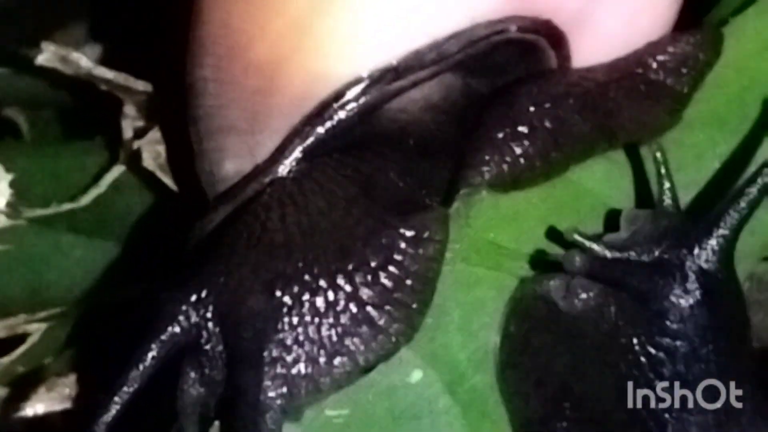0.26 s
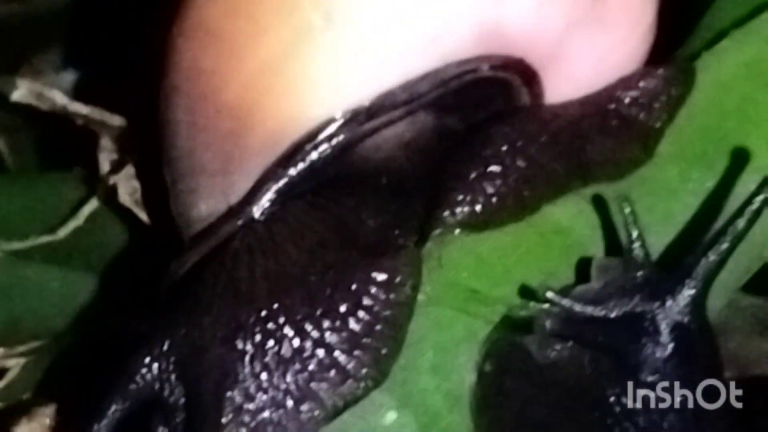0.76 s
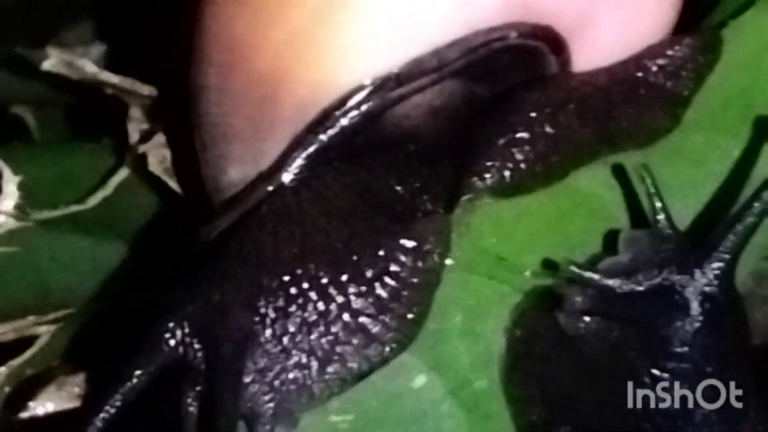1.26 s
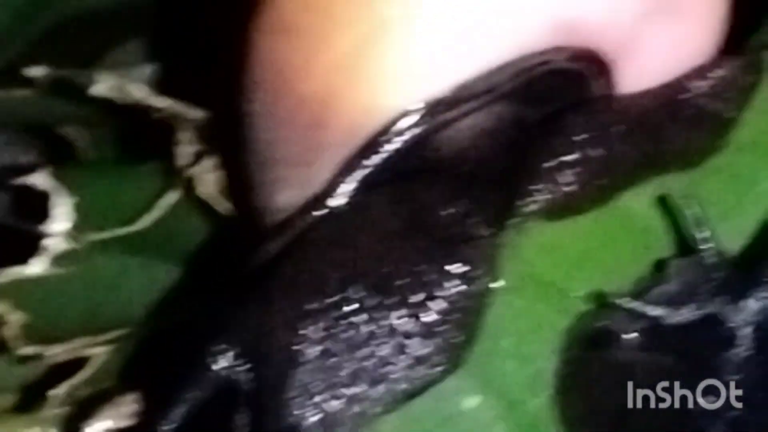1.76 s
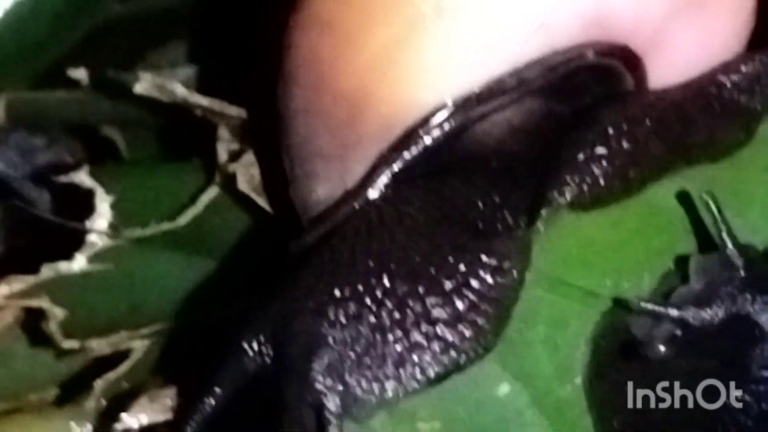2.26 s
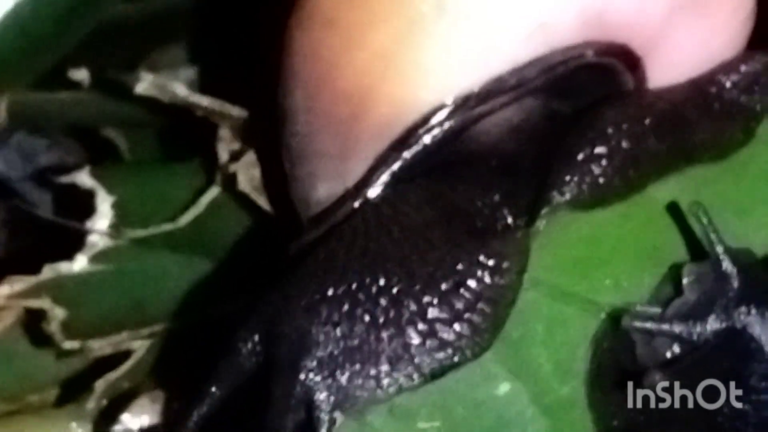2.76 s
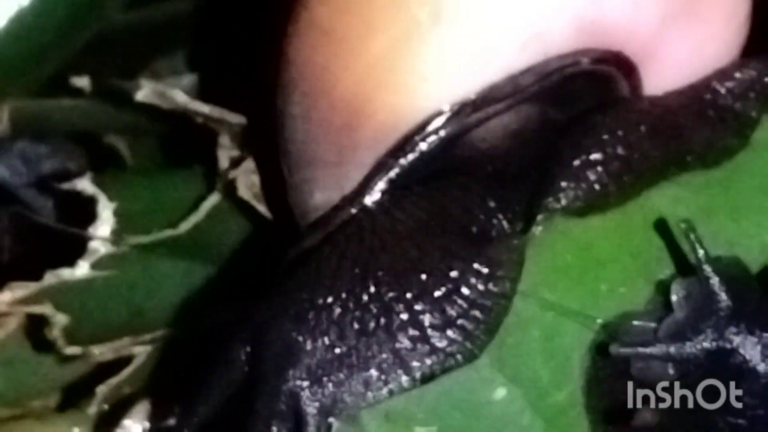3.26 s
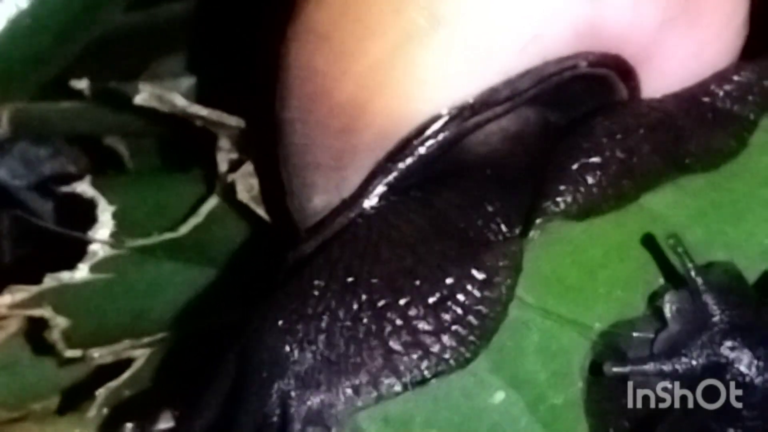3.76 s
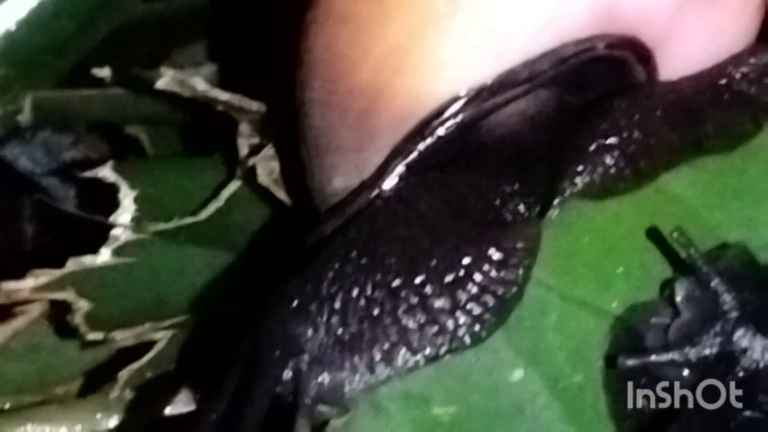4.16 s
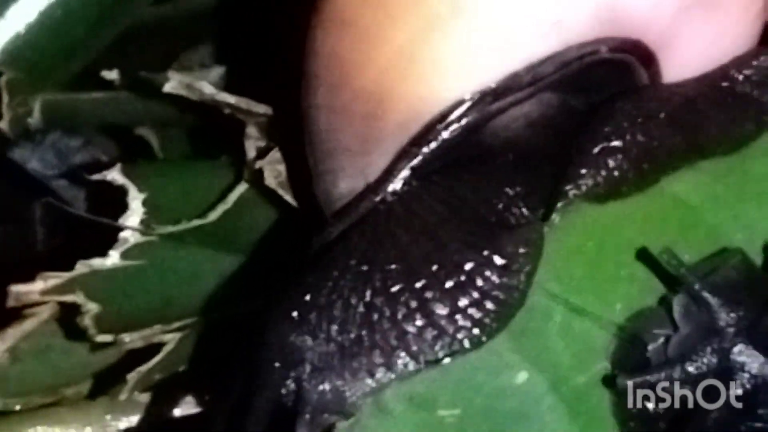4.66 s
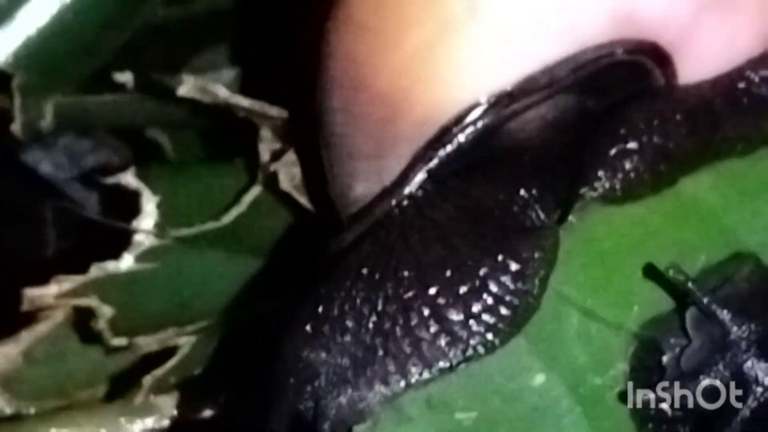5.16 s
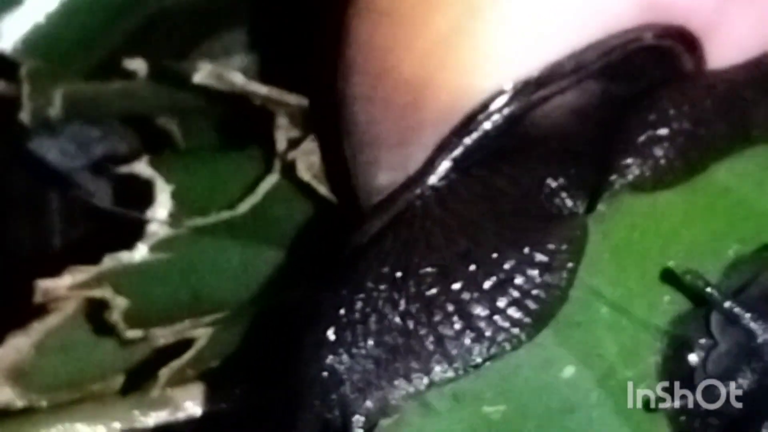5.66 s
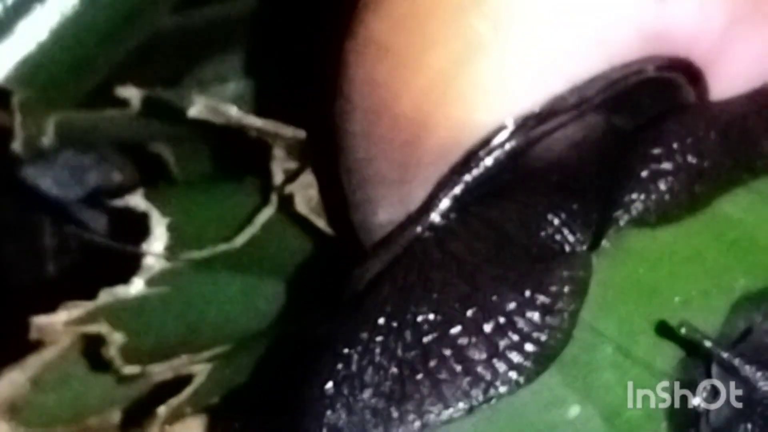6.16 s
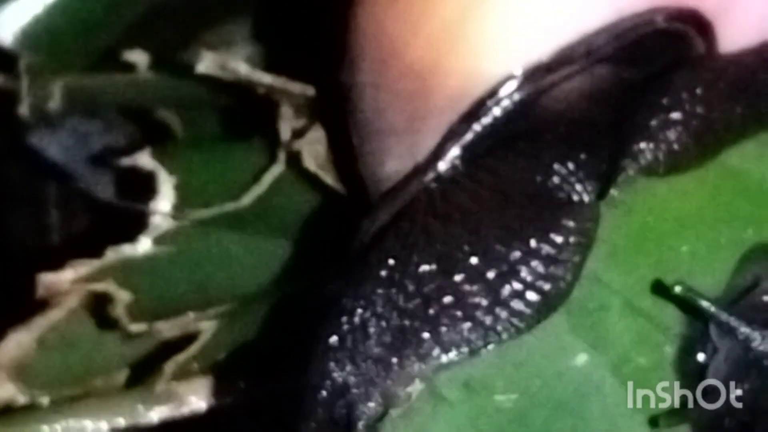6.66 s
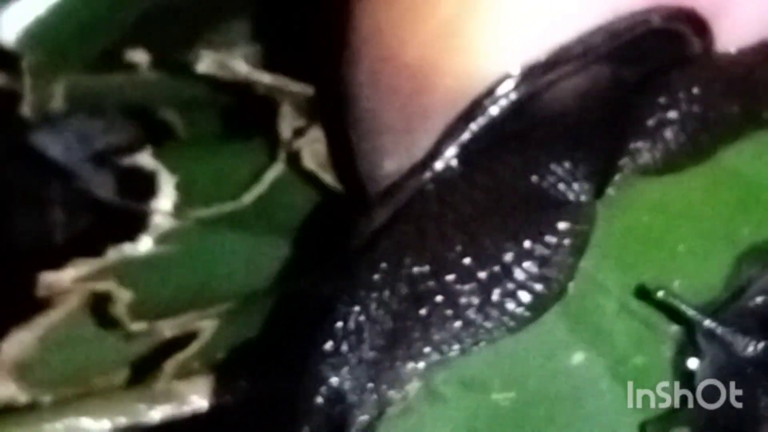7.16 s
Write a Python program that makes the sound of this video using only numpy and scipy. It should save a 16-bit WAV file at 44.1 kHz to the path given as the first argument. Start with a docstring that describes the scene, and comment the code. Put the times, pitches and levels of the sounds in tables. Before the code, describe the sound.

Night in wet vegetation. A close frog gives a high piping call of five rapid pulses, about two and a half times a second, throughout. Behind it, crowds of frogs rattle in uneven volleys, a near cricket chirps shrilly every second and a half, and other crickets trill. Leaves tick and bump softly beside the microphone, over still air with little echo.

```python
"""A near frog repeats a call, mostly of five pulses, over rattling crowds of frogs and chirping, trilling crickets.
It is night in wet vegetation: leaves tick and are bumped softly close by, over still air.
Frogs and crickets are trains of short gliding tones; the crowds' pulses ring coloured throats.
Leaves, air and the crickets' scrape are shaped noise; fading noise serves as the soft echo of the trees."""
import sys
import numpy as np
from scipy import signal
from scipy.fft import rfft, irfft
from scipy.io import wavfile
from scipy.ndimage import uniform_filter1d

SR = 44100
rng = np.random.default_rng(int(sys.argv[2]) if len(sys.argv) > 2 else 0)


def to_wav(s):
    """Save 16-bit WAV."""
    ch = np.atleast_2d(s).T  # columns
    pcm = np.round(np.clip(ch, -1, 1) * 32767)  # PCM
    wavfile.write(sys.argv[1], SR, pcm.astype(np.int16))


N = 327663
T = np.arange(N) / SR
STROKE_S = .0432  # time between the wing strokes of a chirp


def undb(db):
    """Decibels to gain."""
    return 10 ** (np.asarray(db) / 20)


def unit(x):
    """Scale to rms 1."""
    return x / np.sqrt(np.mean(x ** 2))


def curves(table):
    """Each column of a table after its times, joined by straight lines in time."""
    s, *columns = np.transpose(table)
    return [np.interp(T, s, c) for c in columns]


def add(out, s, sound):
    """Mix a sound in at a time in seconds, keeping only what falls inside the scene."""
    i = int(round(s * SR))
    a, b = max(i, 0), min(i + len(sound), N)
    if b > a:
        out[a:b] += sound[a - i:b - i]


def colour(x, points):
    """Filter by a spectrum of (frequency [Hz], level [dB]) points, silent outside them."""
    hz, db = np.transpose(points)
    f = np.maximum(np.fft.rfftfreq(len(x), 1 / SR), 1)
    gain = undb(np.interp(np.log(f), np.log(hz), db, left=-np.inf, right=-np.inf))
    return irfft(rfft(x) * gain, len(x))


def fading_noise(t60):
    """One second of noise that fades by 60 dB in t60 seconds, with unit energy."""
    t = np.arange(SR) / SR
    tail = rng.standard_normal(SR) * np.exp(-np.log(1000) * t / t60)
    return tail / np.linalg.norm(tail)


def trees(x, t60):
    """Diffuse echo from countless leaves and trunks."""
    return signal.fftconvolve(x, fading_noise(t60))[:N]


def syllable(hz, length, rise, glide_hz, steep):
    """One complex tone pulse: it swells for the share `rise` of its length and glides through hz at its peak."""
    u = np.arange(int(length * SR)) / (length * SR)
    attack = (u / rise) ** (steep * rise)
    decay = ((1 - u) / (1 - rise)) ** (steep * (1 - rise))
    phase = 2 * np.pi * np.cumsum(hz + glide_hz * (u - rise)) / SR
    return attack * decay * np.exp(1j * phase)


def with_octave(tone, octave_db):
    """A wing tone with its faint second harmonic, made by squaring the complex tone."""
    return (tone + undb(octave_db) * tone ** 2).real


def still_air():
    """Still night air with a haze of the farthest insects: steady coloured noise."""
    # spectrum: (frequency [Hz], relative level [dB])
    spectrum = [(20, -20), (60, -6), (150, -2.5), (400, -2.5), (900, -2), (4500, 5), (5300, -12),
                (5950, -7), (6350, 2), (8100, 4.5), (9000, -26.5), (12000, -11.5), (15500, -14.5)]
    return undb(-74) * unit(colour(rng.standard_normal(N), spectrum))


def remote_crickets(lo_hz, hi_hz, db, count):
    """Scattered six-stroke chirps from so far off that only their echo arrives."""
    out = np.zeros(N)
    for when, pitch, size in rng.random((count, 3)):
        hz = lo_hz + (hi_hz - lo_hz) * pitch
        stroke = syllable(hz, length=.015, rise=.54, glide_hz=-220, steep=6.5).real
        for k in range(6):
            add(out, when * N / SR + (k - 3) * STROKE_S, undb(11 * size) * stroke)
    return undb(db) * unit(trees(out, t60=.13))


def far_trill(start_s=6.15, hz=4720, stroke_s=.031, db=-63.0):
    """A distant cricket's late trill of upward strokes, heard mostly as echo."""
    out = np.zeros(N)
    for s in np.arange(start_s, N / SR, stroke_s):
        pitch = hz + 40 * rng.standard_normal()
        add(out, s, syllable(pitch, length=.024, rise=.71, glide_hz=450, steep=5.7).real)
    return undb(db) * (.5 * out + trees(out, t60=.51))


def ceaseless_cricket(hz=5660, back_db=-6, neighbours_db=-7):
    """An unbroken even trill, sounding on the forward and the back stroke, over the blur of its neighbours."""
    # loudness of the trill with its neighbours: (time [s], level [dB])
    loudness = [(0.0, -58), (2.65, -62), (3.12, -65), (3.74, -61.5), (4.14, -67.5), (4.16, -60),
                (4.26, -63.5), (5.48, -63), (6.02, -57.5), (7.43, -59.5)]
    stroke_hz, back_s = 48.545, .0104  # stroke pairs per second; delay of the back stroke
    out = np.zeros(N)
    for s in np.arange(0, N / SR, 1 / stroke_hz):
        forward_gain, back_gain = undb(rng.standard_normal(2))
        forward = syllable(hz, length=.014, rise=.46, glide_hz=-61, steep=2).real
        back_pitch = hz + 30 * rng.standard_normal()
        back = syllable(back_pitch, length=.011, rise=.59, glide_hz=91, steep=7.3).real
        add(out, s, forward_gain * forward)
        add(out, s + back_s, back_gain * undb(back_db) * back)
    neighbours = colour(rng.standard_normal(N), [(5430, -22), (5570, -16.0), (5640, 1.5), (5720, -5),
                                                 (5790, -1.5), (5920, -40)])
    return unit(unit(out) + undb(neighbours_db) * unit(neighbours)) * undb(curves(loudness)[0])


def trilling_cricket(hz=4985, warm_up_hz=340, third_db=-19, echo_db=-7):
    """Trills of about a second whose upward-gliding strokes climb to full pitch and strength."""
    # trills: (start [s], wing strokes, level of the full strokes before scatter [dB])
    trills = [(1.012, 32, -47.5), (3.09, 32, -48), (5.286, 30, -48)]
    stroke_s = .02875
    out = np.zeros(N)
    for s, count, db in trills:
        for k in range(round(count)):
            cold = np.exp(-(k / 4.9) ** 1.4)  # 1 at the first stroke, fading to 0
            size, detune = rng.standard_normal(2)
            pitch = hz - warm_up_hz * cold + 12 * detune
            glide = 430 * (1 - .5 * cold)
            stroke = syllable(pitch, length=.021, rise=.41, glide_hz=glide, steep=4.9)
            overtone = undb(third_db) * (1 - cold) * stroke ** 3  # third harmonic
            add(out, s + k * stroke_s, undb(db - 2.5 * cold + 1.8 * size) * (stroke + overtone).real)
    return out + undb(echo_db) * trees(out, t60=.4)


def far_crickets(echo_db=3, direct_db=-4, uneven_db=.96):
    """Far chirps that swell and fade, half lost in echo; each cricket has an even pace and a slightly drifting pitch."""
    # singers: (first chirp [s], period [s], wing strokes, mean pitch [Hz], level before direct/echo gains [dB])
    singers = [(-.29, 1.174, 8, 6900, -46), (.12, 1.2, 8, 6930, -49), (-.01, 1.19, 8, 7610, -49.5),
               (.6, 1.05, 8, 7460, -52), (.625, 1.287, 8, 7120, -51.5), (.238, 1.8, 6, 7150, -49.5)]
    out = 0
    for first, period, count, hz, db in singers:
        song = np.zeros(N)
        for n, (effort, drift) in enumerate(rng.standard_normal((8, 2))):
            for k, swell in enumerate(np.hanning(round(count) + 2)[1:-1] ** .22):
                size, detune = rng.standard_normal(2)
                pitch = hz + 30 * drift + 45 * detune
                stroke = syllable(pitch, length=.018, rise=.5, glide_hz=-220, steep=3.3)
                gain = swell * undb(db + uneven_db * effort + 2 * size)
                add(song, first + n * period + k * STROKE_S, gain * with_octave(stroke, octave_db=-28.5))
        out = out + undb(direct_db) * song + undb(echo_db) * trees(song, t60=.35)
    return out


def rattles(lo_hz, hi_hz, pulse_hz, note_s, count, climb=.0499, ring=.28, size_db=12):
    """Frogs' notes: each is a swelling run of pulses that ring the throat on its own slowly rising pitch."""
    out = np.zeros(N)
    for start, pace, length, size, pitch in rng.random((count, 5)):
        u = np.linspace(0, 1, int(SR * note_s * (.5 + length)))
        cycle = np.arange(len(u)) / SR * pulse_hz * (1 + .5 * (pace - .5)) % 1  # place within a pulse
        hz = (lo_hz + (hi_hz - lo_hz) * pitch) * (1 + climb * (u - .5))
        pulses = np.minimum(10 * cycle, 1) * np.exp(-cycle / ring)
        note = np.hanning(len(u)) ** .5 * pulses * np.sin(2 * np.pi * np.cumsum(hz) / SR)
        add(out, start * (N / SR + note_s) - note_s, undb(size_db * size) * note)
    return out


def crowd(throat, pulse_hz, note_s, count):
    """Three groups of frogs of one kind, each as loud as its own echo, coloured by the throat and evened out."""
    out = 0
    for _ in range(3):
        notes = rattles(throat[1][0], throat[-2][0], pulse_hz, note_s, count)
        out = out + notes + trees(notes, t60=.27)
    out = unit(colour(out, throat))
    return out / np.sqrt(uniform_filter1d(out ** 2, size=3000) + 1e-3)  # level over about 68 ms


def calling(din, volleys, attack_s, release_s):
    """Crowd gain per level column: over the din, each volley swells, holds and dies by 60 dB in release_s."""
    power = undb(curves(din)) ** 2
    for s, length, *db in volleys:
        attack = np.clip((T - s) / attack_s, 0, 1)
        release = np.exp(-np.log(1000) * np.clip((T - s - length) / release_s, 0, 2))
        power = power + np.outer(undb(db), attack * release) ** 2
    return np.sqrt(power)


def frog_crowds(lower_db=-.16, upper_db=.08, low_db=-.38, small_db=-.3):
    """Three kinds of frog call in volleys over a din; the high-voiced kind sounds on two throat resonances."""
    # throat resonances: (frequency [Hz], relative level [dB])
    high_lower, high_upper = [(1300, -38), (1560, -9), (1690, 5), (1880, 1), (2100, -1), (2300, -6),
                              (2480, -15), (2800, -40)], [(2900, -50), (3350, -7), (3650, 6.5), (3900, 6),
                                                  (4150, 1), (4350, -17.5), (4800, -34), (5300, -70.5)]
    low_throat, small_throat = [(950, -52.5), (1120, -18), (1210, -4), (1430, 2), (1580, 0.5),
                                (1750, -17.5), (2200, -39.5)], [(2500, -30), (2720, -3), (2950, 4.5), (3080, -0.5),
                                                    (3300, -3.5), (3500, -20), (4000, -42.5)]
    # all din and volley levels stand before the crowd's trim
    # high-voiced din: (time [s], lower resonance level [dB], upper resonance level [dB])
    high_din = [(0.0, -46.5, -49.5), (0.6, -50.5, -55), (1.15, -53.5, -59.5), (1.4, -70.5, -70.5),
                (3.6, -76, -71.5), (4.1, -85, -70.5), (4.6, -66, -58), (5.1, -50, -51.5),
                (6.0, -48.5, -52.5), (7.43, -47.0, -50.5)]
    # high-voiced volleys: (start [s], length [s], lower resonance level [dB], upper resonance level [dB])
    high_volleys = [(0.2, 0.19, -47.5, -57.5), (0.435, 0.13, -47, -50.5), (0.65, 0.13, -48.0, -52.5),
                    (1.003, 0.083, -53, -50.0), (1.17, 0.11, -49.5, -55.0), (1.442, 0.13, -50.5, -55.0),
                    (1.692, 0.15, -52.5, -56), (1.91, 0.13, -54, -70), (2.16, 0.14, -52, -53.5),
                    (2.375, 0.14, -60, -67), (2.602, 0.22, -52.5, -55.5), (2.81, 0.083, -54.5, -54),
                    (3.054, 0.09, -49, -53.0), (3.313, 0.09, -57.5, -54), (3.683, 0.14, -53, -53.5),
                    (3.845, 0.098, -54.5, -53), (4.133, 0.095, -52.5, -52.0), (4.278, 0.095, -58, -55.5),
                    (4.45, 0.088, -48.5, -49.5), (4.63, 0.2, -50.0, -53.5), (4.94, 0.065, -46.5, -55),
                    (5.311, 0.19, -47, -53.5), (5.778, 0.21, -50, -52.5), (6.149, 0.12, -47.5, -48.0),
                    (6.462, 0.17, -48, -52), (6.98, 0.13, -48.5, -51.0)]
    # din of the low-voiced and the small frogs: (time [s], level [dB])
    low_din, small_din = [(0.0, -54.5), (0.4, -50), (1.8, -52), (2.9, -54.5), (3.05, -67.0), (4.3, -80.5),
                          (4.7, -77.5), (6.1, -73.5), (7.43, -76)], [(0.0, -54.5), (0.4, -49), (1.8, -48.5), (2.3, -59), (3.3, -58.5),
                                           (3.9, -52.5), (4.6, -61), (5.4, -56.5), (6.1, -67), (6.6, -63.5),
                                           (7.43, -51)]
    # their volleys: (start [s], length [s], level [dB])
    low_volleys, small_volleys = [(3.07, 0.07, -58.5), (3.271, 0.085, -60.5), (3.477, 0.14, -60.5),
                                  (3.665, 0.16, -54.5), (3.902, 0.12, -53.5), (4.142, 0.1, -52),
                                  (4.395, 0.07, -63), (4.67, 0.065, -66.5), (5.275, 0.065, -59),
                                  (6.385, 0.07, -62), (6.542, 0.099, -60.5), (6.716, 0.14, -54.5),
                                  (6.957, 0.12, -58.5), (7.02, 0.09, -67), (7.155, 0.13, -55.5),
                                  (7.36, 0.08, -60)], [(2.02, 0.063, -50.5), (2.268, 0.12, -51.5),
                                                       (2.485, 0.18, -52.5), (2.6, 0.06, -53),
                                                       (2.84, 0.095, -56.5), (4.15, 0.14, -50.5),
                                                       (4.446, 0.13, -50.5), (4.66, 0.14, -55),
                                                       (4.83, 0.14, -55)]
    lower, upper = calling(high_din, high_volleys, attack_s=.064, release_s=.37)
    low, = calling(low_din, low_volleys, attack_s=.028, release_s=.42)
    small, = calling(small_din, small_volleys, attack_s=.042, release_s=.29)
    return (undb(lower_db) * lower * crowd(high_lower, pulse_hz=174.8, note_s=.07, count=300)
            + undb(upper_db) * upper * crowd(high_upper, pulse_hz=109.7, note_s=.08, count=320)
            + undb(low_db) * low * crowd(low_throat, pulse_hz=76.7, note_s=.12, count=170)
            + undb(small_db) * small * crowd(small_throat, pulse_hz=76.94, note_s=.11, count=180))


def near_cricket(hz=7640, first_drop_hz=100, first_db=-7, scrape_db=-13, echo_db=-4, count=6):
    """Six wing strokes a chirp, the first softer and lower; a rough scrape peaks on the wing's resonance."""
    # chirps: (start [s], stroke level before scatter [dB])
    chirps = [(.474, -34), (1.891, -32.5), (3.273, -33), (4.718, -33.5), (6.176, -33.5)]
    peaks, pressure = np.zeros(N), np.zeros(N)
    for s, db in chirps:
        for k in range(count):
            first = k == 0
            size, detune = rng.standard_normal(2)
            pitch = hz - first_drop_hz * first + 15 * detune
            peak = syllable(pitch, length=.02, rise=.6, glide_hz=-160, steep=11)
            gain = undb(db + first_db * first + .7 * size)
            add(peaks, s + k * STROKE_S, gain * with_octave(peak, octave_db=-34))
            add(pressure, s + k * STROKE_S, gain * np.hanning(int(STROKE_S * SR)) ** .5)
    scrape = colour(rng.standard_normal(N), [(6900, -32.5), (7150, -15.0), (7350, -2.5), (7480, 1.0),
                                             (7700, -0.5), (7810, -32.5)])
    out = peaks + undb(scrape_db) * pressure * unit(scrape)
    return out + undb(echo_db) * trees(out, t60=.49)


def leaves(patter_db=-77):
    """Sharp ticks with a short rustle behind them, dull bumps of band-passed noise, and a faint patter of drips."""
    # leaf ticks: (time [s], snap energy before colouring [dB], rustle energy before colouring [dB])
    tick_table = [(.374, -52, -34.5), (.716, -54, -47.5), (1.022, -60, -36.5), (1.326, -51, -51.5),
                  (1.529, -38.5, -37), (2.076, -50, -43.5), (2.228, -31.5, -36), (2.402, -36, -45),
                  (3.137, -39, -45), (3.726, -51, -44), (5.214, -54, -40), (5.797, -54.5, -40),
                  (5.869, -45, -46), (6.421, -60, -43), (6.794, -50.5, -44.5), (6.928, -43.5, -56),
                  (7.044, -36, -34.5)]
    # soft bumps on leaves and stems: (time [s], peak level [dB], pitch [Hz], fade of the noise by 60 dB [s])
    bump_table = [(.386, -61.5, 696, 0.12), (1.0, -68.5, 180, 0.22), (1.02, -62, 810, 0.23),
                  (1.56, -63, 1000, .095), (1.77, -69, 280, .23), (2.085, -42, 1780, .028),
                  (2.662, -58.5, 945, 0.15), (2.70, -62, 604, 0.22), (3.145, -59.5, 880, .15),
                  (3.938, -33.5, 1750, .026), (4.467, -61, 680, .14), (4.48, -68, 200, .25),
                  (4.754, -52, 670, .24), (4.821, -54.5, 187, 0.35), (4.83, -61.5, 266, 0.36),
                  (5.9, -59, 1110, .092), (6.42, -56, 780, 0.21), (6.425, -69.5, 258, 0.24),
                  (7.264, -63.5, 520, 0.1)]
    ticks, bumps = np.zeros(N), np.zeros(N)
    for s, snap_db, rustle_db in tick_table:
        snap = undb(snap_db) * fading_noise(t60=.0034)
        rustle = undb(rustle_db) * fading_noise(t60=.26)
        add(ticks, s, snap + rustle)
    drips = [(when * N / SR, patter_db + 8 * size, 400 + 650 * pitch, .09)
             for when, size, pitch in rng.random((18, 3))]
    for s, db, hz, t60 in list(bump_table) + drips:
        body = signal.butter(3, [hz * .8, hz * 1.22], "band", fs=SR, output="sos")
        bump = signal.sosfilt(body, fading_noise(t60))
        add(bumps, s, undb(db) * bump / np.abs(bump).max())
    return bumps + colour(ticks, [(400, -25.5), (1500, 0.5), (4500, 3), (9000, 3.5), (12000, 7.5), (16000, 8)])


def near_frog(sac_hz=2686, pulse_hz=2724, sag_hz=-215, ground_db=-14, echo_db=-24, waver_hz=5):
    """Pulses start fast, sag in pitch and keep step with the vocal sac; the ground returns each a moment later."""
    # calls: (start [s], pulses)
    calls = [(-.089, 5), (.3115, 5), (.713, 5), (1.1525, 5), (1.5258, 5), (1.893, 5), (2.228, 5),
             (2.6237, 5), (3.002, 5), (3.391, 5), (3.753, 5), (4.111, 5), (4.467, 5), (4.839, 5),
             (5.2085, 5), (5.5705, 5), (5.993, 3), (6.275, 5), (6.666, 5), (7.083, 5), (7.421, 5)]
    pulse_s, ground_s = .02565, .0095  # time between pulses; delay of the ground's return
    ground_turn = np.exp(2j * np.pi * sac_hz * ground_s)  # phase of the return
    out = np.zeros(N)
    for s, count in calls:
        call_hz = sac_hz + waver_hz * rng.standard_normal()
        for k in range(round(count)):
            size, slip, late = rng.standard_normal(3)
            start = k * pulse_s + .00021 * late
            sac_phase = 2 * np.pi * call_hz * start + .3 * slip
            pulse = syllable(pulse_hz, length=.023, rise=.27, glide_hz=sag_hz, steep=3.9)
            pulse = undb(-31 + .51 * size) * pulse * np.exp(1j * sac_phase)
            add(out, s + start, pulse.real)
            add(out, s + start + ground_s, undb(ground_db) * (pulse * ground_turn).real)
    return out + undb(echo_db) * trees(out, t60=1.0)


def scene():
    """Frogs, crickets and leaves over still air."""
    remote = remote_crickets(6700, 7700, db=-69, count=50) + remote_crickets(6000, 6550, db=-81, count=40)
    crickets = far_trill() + ceaseless_cricket() + trilling_cricket() + far_crickets() + near_cricket()
    return (still_air() + remote + crickets + frog_crowds() + leaves() + near_frog())[None]


def record(dry):
    """The phone cuts the top: a steep elliptic low-pass at 15.56 kHz."""
    return signal.sosfilt(signal.ellip(10, .2, 70, 15560, fs=SR, output="sos"), dry)


dry = scene()
out = record(dry)
to_wav(out)
```